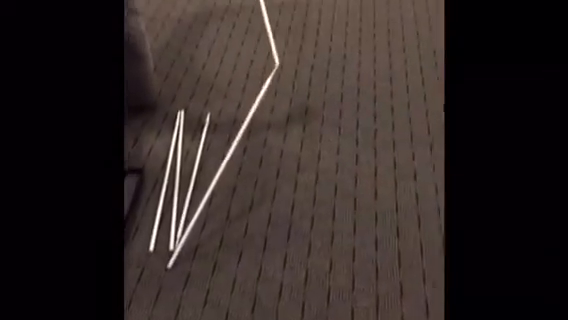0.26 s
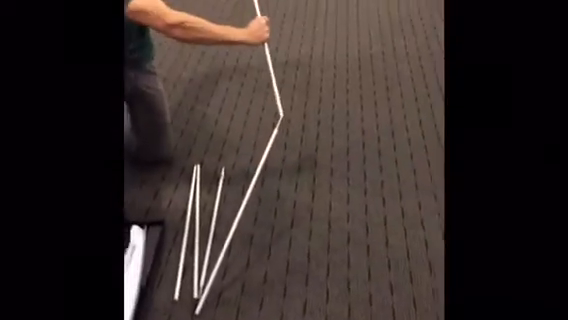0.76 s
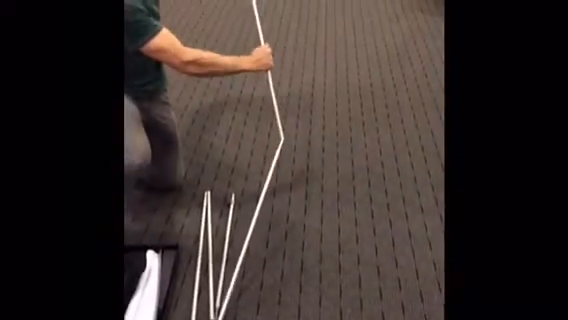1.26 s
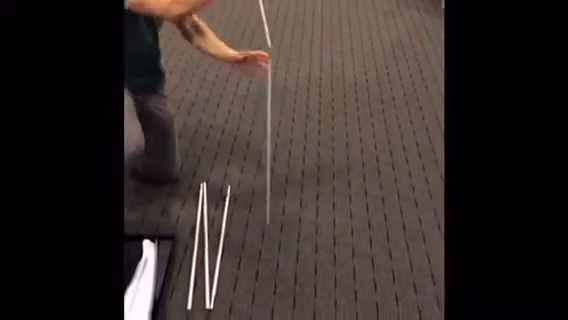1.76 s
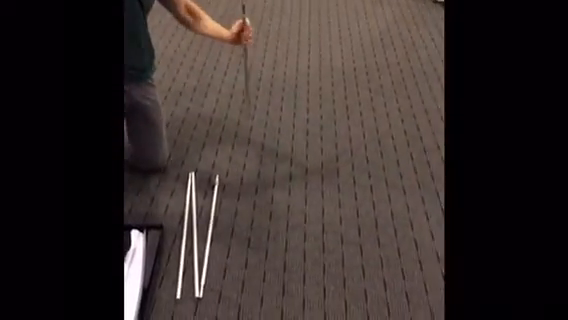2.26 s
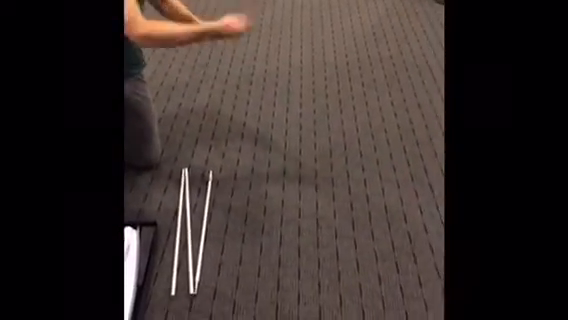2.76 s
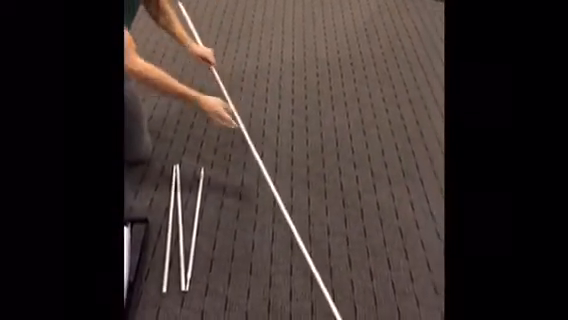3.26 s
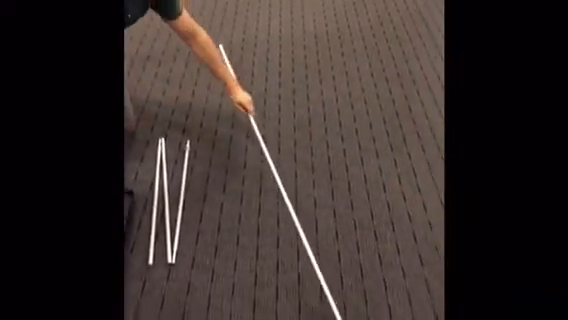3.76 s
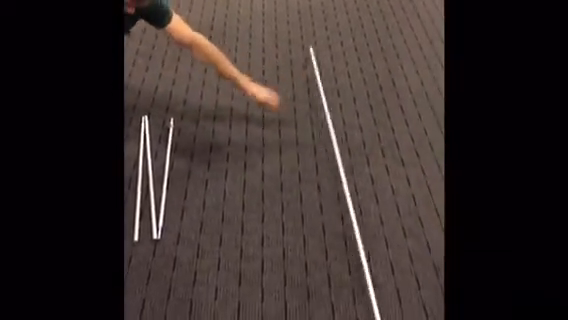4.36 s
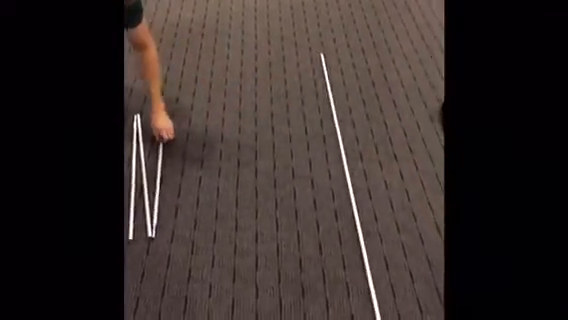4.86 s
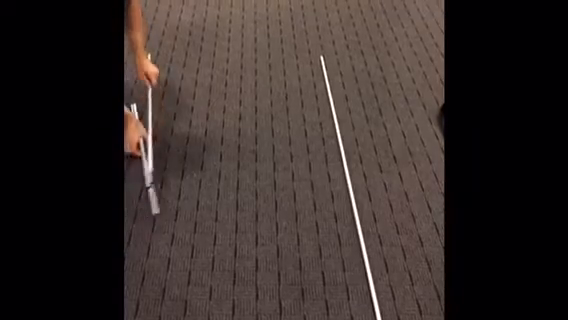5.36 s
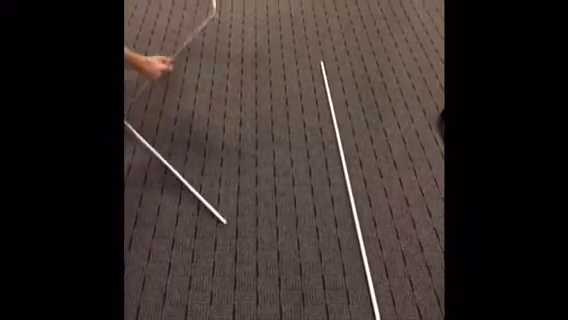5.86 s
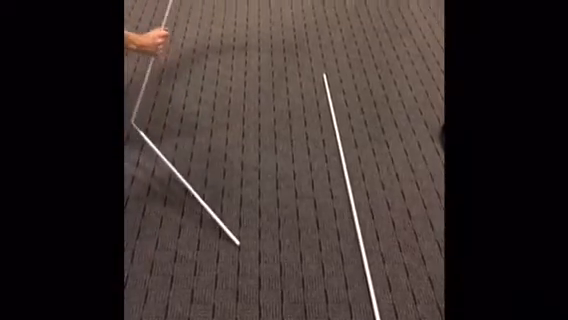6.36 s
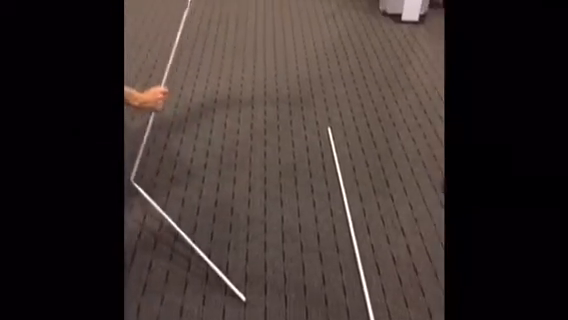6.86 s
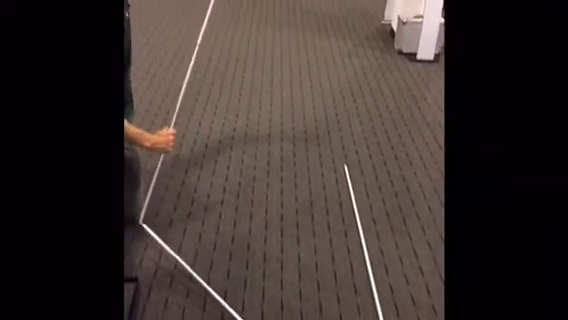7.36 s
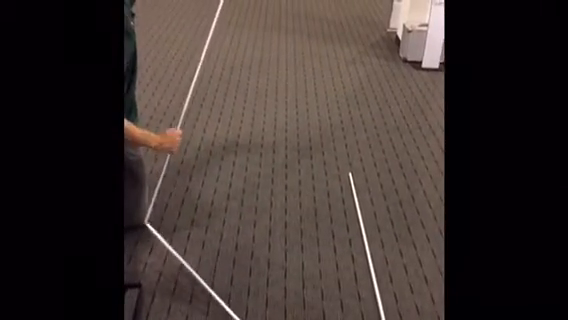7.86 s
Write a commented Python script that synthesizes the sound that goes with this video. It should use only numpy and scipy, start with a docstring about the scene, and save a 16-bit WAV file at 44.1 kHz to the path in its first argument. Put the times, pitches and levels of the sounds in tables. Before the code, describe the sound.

Close, single-channel sound of tent-like poles being assembled indoors, with slight room reverberation. Dry sharp clicks come in irregular groups, with barely audible ticking and skin sliding between them. A finished pole falls on carpet, clattering in a tight burst. After a quiet spell, another joint shoots home with a clear metallic ring. Low airflow and fan hum never stop.

```python
"""A carpeted, ventilated room: shock-corded tent poles are unfolded, their metal ferrules ticking into the sockets.
Each contact is a chatter of filtered noise impacts; each tube is a sum of decaying bending modes.
One finished pole is let go, thuds and rattles on the floor; a joint of the next one shoots home and rings.
Hands slide along the tubes as shaped noise; coloured noise and wavering tones form the ventilation throughout."""
import sys
import numpy as np
from scipy import signal
from scipy.fft import rfft, irfft, next_fast_len
from scipy.io import wavfile
from scipy.ndimage import uniform_filter1d, minimum_filter1d

SR = 44100
rng = np.random.default_rng(int(sys.argv[2]) if len(sys.argv) > 2 else 0)


def output_pcm(signal):
    """Save a mono or channel-first signal as 16-bit PCM at the path in sys.argv[1].

    Samples are clipped to [-1, 1] before scaling.
    """
    pcm = np.clip(np.atleast_2d(signal).T, -1, 1) * 32767
    wavfile.write(sys.argv[1], SR, np.round(pcm).astype(np.int16))


N = 358533

# ventilation spectrum: (frequency [Hz], relative density [dB per Hz])
AIR_SPECTRUM = [(20, -23.5), (31, -14.5), (62, 0), (130, -1), (210, -6.5), (300, -10.5), (450, -19.5),
                (790, -25.5), (1300, -27.5), (2000, -32.5), (3200, -41.5), (6000, -48.5), (10000, -55),
                (15500, -59.5)]
# fan and duct tones: (frequency [Hz], rms level [dB], phase drift that broadens the line [Hz])
FAN_TONES = [(119, -41.5, 4), (177.7, -43, 3), (240, -47, 4), (349, -53, 5), (359, -53, 4), (580, -66, 5),
             (7120, -79, 80), (7900, -81, 150)]
# ferrules meeting their sockets:
# (time [s], relative level [dB], edge [dB], favoured tube pitch [Hz], chatter [s])
CLICKS = [(0.146, -20.5, -14, 4950, 0.0045), (1.114, -25, -6, 3070, .006), (1.122, -30, -16.5, 3240, .003),
          (1.151, -33, -4, 2960, 0.0035), (1.178, -22, -11, 2350, 0.0028),
          (1.201, -6.5, -6.5, 2460, 0.0096), (1.28, -15.5, -15, 3320, 0.0094),
          (1.819, -33.5, -16, 3050, 0.0045), (2.419, -35, -17.5, 3010, 0.0054),
          (2.478, -39, -5, 2740, 0.0061), (2.604, -2.5, -5, 5300, .007), (2.659, -13.5, 3, 2400, 0.002),
          (2.733, -15.5, -3, 2470, 0.0076), (3.174, -34.5, -25, 3210, .004), (3.541, -30, -6, 2950, .005),
          (5.408, -31.5, -23, 3500, 0.0087), (5.421, -29.5, -16, 3260, 0.0045),
          (5.437, -28, -18, 3140, 0.0046), (5.584, -23.5, -28, 3400, 0.0013),
          (6.8, -39.5, -22, 3230, 0.0042), (7.217, -13.5, -13, 2450, 0.0021)]
# spells of faint ticking while a section shifts in its joint:
# (start [s], end [s], mean relative level [dB], edge [dB])
TICKING = [(1.436, 1.654, -43, 4), (1.716, 1.774, -50, 8), (3.724, 3.967, -43, -14),
           (4.931, 5.142, -43.5, -20)]
# spectrum of a ferrule tick: (frequency [Hz], relative density [dB per Hz])
TICK_SPECTRUM = [(100, -43), (600, -19), (1200, -4.5), (1900, -3), (2500, -2), (3600, -4.5), (5400, -5.5),
                 (7500, -6.5), (10000, -4.5), (15000, -14)]
# modes of tube sections with play in their joints: (frequency [Hz], relative level [dB], t60 [s])
LOOSE_MODES = [(1130, -12, .05), (1760, -16, .1), (2400, -5, .12), (2490, -5, .09), (3000, -4, .1),
               (3190, -1, .11), (3290, -4, .09), (3450, -6, .07), (4010, -4, .08), (4215, -2, .1),
               (4680, -3, .08), (4950, -2, .08), (5280, 0, .08), (5600, -2, .07), (6030, -2, .09),
               (6400, -4, .07), (7400, -4, .07), (8400, -7, .06), (9450, -9, .05)]
# strokes of skin along the tube: (start [s], end [s], nominal level [dB])
STROKES = [(3.065, 3.347, -75), (3.72, 3.77, -63), (5.138, 5.509, -68), (5.8, 6.199, -68),
           (8.092, 8.13, -61.5)]
# spectrum of sliding skin: (frequency [Hz], relative density [dB per Hz])
SKIN_SPECTRUM = [(1500, -22), (4000, 5), (9000, 3), (15000, 2)]
# the dropped pole hitting the floor:
# (time [s], relative level [dB], chatter [s], t60 of the rattle that follows [s])
BOUNCES = [(4.409, 7.5, 0.0071, 0.15), (4.43, -1, 0.012, 0.5), (4.509, -10, .004, 0.6),
           (4.547, -9.5, 0.0034, 0.21), (4.575, -16, 0.0061, 0.11), (4.621, 4.5, 0.0042, 0.76),
           (4.647, -1, 0.0056, 0.18), (4.732, 0.5, 0.003, 0.16), (4.779, -9, 0.0027, 0.068)]
# spectrum of the pole landing on carpet: (frequency [Hz], relative density [dB per Hz])
THUD_SPECTRUM = [(40, -21.5), (190, 11.5), (320, -5), (520, -14.5), (900, -27), (3000, -62.5)]
# spectrum of a loose joint knocking: (frequency [Hz], relative density [dB per Hz])
RATTLE_SPECTRUM = [(100, -31.5), (450, -7), (850, -57.5), (1400, -11.5), (2200, -5.5), (3200, 0),
                   (4400, -0.5), (7000, -4), (10000, -6.5), (15000, -17.5)]
# the cord pulls a joint fully home: (time [s], relative level [dB])
SNAPS = [(7.764, -5)]
# spectrum of the joint slamming home: (frequency [Hz], relative density [dB per Hz])
SLAM_SPECTRUM = [(100, -48), (550, -25), (800, -8.5), (1200, -14), (1800, -3), (3200, 6.5), (5500, 6),
                 (8000, 0), (11500, -5.5), (15000, -8)]
# modes of the tightly seated pole: (frequency [Hz], relative level [dB], t60 [s])
SEATED_MODES = [(1170, -11, .12), (1745, -11, .7), (1770, 7, .08), (1820, -1, .1), (2385, -3, .38),
                (2411, -3, .36), (3005, -6, .2), (3190, 0, .3), (3340, -6, .18), (4066, 5, .26),
                (4088, -1, .36), (5110, -7, .38), (5250, -5, .2), (6025, -9, .3), (7161, 0, .31),
                (8257, -6, .24), (9330, -6, .23), (10570, -10, .2)]
# reverberation of the room: (frequency [Hz], t60 [s])
ROOM_DECAY = [(200, 0.4), (1000, 0.83), (3000, 0.52), (6000, 0.37), (10000, 0.35), (15000, 0.26)]

AIR_DB = -36.5  # rms level of the rush
SOFT_DB, THINNING = -31.5, 0.5  # a click harder than this loses body, in dB per dB
FERRULE_HZ = 5370
RING_DB, RING_LOSS = 2.5, 0.2  # ring against a soft tick [dB], and its loss per dB of force
GRIP_T60_S = 0.31  # the hand around the tube shortens its ring
FAINT_TUBE_HZ, FAINT_CHATTER_S = 3170, 0.005
STROKE_RISE_S, STROKE_T60_S = 0.04, 0.45  # time constant of the swell; release
RATTLE_GAPS_S = (0.00315, 0.0147)  # shortest and longest gap between knocks
RATTLE_DB, RATTLE_CHATTER_S = -5.5, 0.0048  # rattle against its bounce; chatter of each knock
# body of a 0 dB knock [dB], body lost per dB of force, edge [dB]
BOUNCE_BODY_DB, BOUNCE_THINNING, BOUNCE_EDGE_DB = 1, 0.69, -4.5
OVERLOAD = 1.4  # level at which the microphone saturates (full scale 1)
TOP_HZ = 15600  # upper band limit


def amp(db):
    """Level in dB expressed as an amplitude ratio."""
    return 10 ** (np.asarray(db) / 20)


def unit(x):
    """Normalization to an rms of 1."""
    return x / np.sqrt(np.mean(x ** 2) + 1e-20)


def along(points, hz):
    """Linear interpolation of (frequency [Hz], value) points on a log-frequency axis."""
    f, v = np.transpose(points)
    return np.interp(np.log(hz + 1), np.log(f + 1), v)


def fade(t, t60):
    """Exponential decay: 60 dB in t60 seconds."""
    return np.exp(-np.log(1000) * t / np.maximum(t60, 1e-4))


def noise(gain, size):
    """Spectral shaping: white noise filtered by a gain over frequency, at rms 1."""
    m = next_fast_len(size)
    spectrum = rfft(rng.standard_normal(m)) * gain(np.fft.rfftfreq(m, 1 / SR))
    return unit(irfft(spectrum, m)[:size])


def add(track, s, sound):
    """Superposition: a sound is summed into the track from time s."""
    part = track[round(s * SR):]
    part[:len(sound)] += sound[:len(part)]


def ventilation():
    """Broadband flow noise with fan tones whose lines are broadened by a random walk of phase."""
    rush = amp(AIR_DB) * noise(lambda hz: amp(along(AIR_SPECTRUM, hz)), N)
    t = np.arange(N) / SR
    for hz, db, width in FAN_TONES:
        drift = np.cumsum(rng.standard_normal(N)) * np.sqrt(np.pi * abs(width) / SR)
        phase = 2 * np.pi * hz * t + uniform_filter1d(drift, size=128)
        rush = rush + amp(db) * np.sqrt(2) * np.sin(phase)
    return rush


def tilt(hz, body_db, edge_db):
    """Contact stiffness as spectral balance: body below 1.9 kHz against edge above 11 kHz."""
    return along([(1900, body_db), (5200, 0), (7000, 0), (11000, edge_db)], hz)


def bump(hz, centre_hz, height_db):
    """A resonance in dB, at half its height about a semitone from the centre."""
    return height_db / (1 + (np.log(hz / centre_hz + 1e-9) / 0.057) ** 2)


def crack(colour, hold, t60, grain_db, first_db):
    """Impact excitation: a hard first contact, a few ms of tiny impacts, then a fast decay."""
    t = np.arange(SR // 2) / SR
    impacts = amp(grain_db * noise(lambda hz: 1 / (1 + (hz / 600) ** 4), len(t)))
    burst = unit(impacts * noise(lambda hz: amp(colour(hz)), len(t)))
    chatter = fade(np.maximum(t - hold, 0), t60)
    first_contact = amp(first_db) * fade(t, t60=0.0054)
    return burst * (chatter + first_contact)


def ring(modes, scatter_db, pitch_hz=1, focus_db=0):
    """Modal superposition: bending modes of the tube, weighted by the place of contact."""
    t = np.arange(SR // 2) / SR
    hz, db, t60 = np.transpose(modes)[:, :, None]
    scatter = scatter_db * rng.standard_normal(hz.shape)
    size = amp(db + bump(hz, pitch_hz, focus_db) + scatter)
    waves = np.sin(2 * np.pi * (hz * t + rng.random(hz.shape)))
    onset = 1 - fade(t, t60=0.003)
    return np.sum(size * waves * onset * fade(t, t60), axis=0) / np.linalg.norm(size)


def in_room(sound, wet_db, delay):
    """Reverberation: direct sound, then the diffuse answer of the distant walls, by convolution."""
    hz, t, z = signal.stft(rng.standard_normal(SR * 3 // 4), SR, nperseg=256)
    decay = fade(t, along(ROOM_DECAY, hz)[:, None])
    tail = signal.istft(z * decay, SR, nperseg=256)[1]
    tail *= 1 - np.exp(-(np.arange(len(tail)) / SR / delay) ** 2)  # gradual build-up
    response = amp(wet_db) * tail / np.linalg.norm(tail)
    response[0] += 1  # direct sound
    return signal.fftconvolve(sound, response)


def click(db, edge_db, tube_hz, chatter):
    """Force-dependent contact: the harder the ferrule strikes, the thinner it sounds."""
    excess_db = db - SOFT_DB

    def colour(hz):
        balance = tilt(hz, -THINNING * excess_db, edge_db)
        return along(TICK_SPECTRUM, hz) + balance + bump(hz, FERRULE_HZ, height_db=3)

    tick = crack(colour, hold=chatter, t60=0.03, grain_db=-0.5, first_db=1.5)
    grip = fade(np.arange(len(tick)) / SR, GRIP_T60_S)
    tube = ring(LOOSE_MODES, scatter_db=1.5, pitch_hz=tube_hz, focus_db=14.5)
    tone = amp(RING_DB - RING_LOSS * excess_db) * grip * tube
    tick_heard = in_room(tick, wet_db=-7.5, delay=0.015)
    tone_heard = in_room(tone, wet_db=-12.5, delay=0.015)
    return amp(db - 12.5) * (tick_heard + tone_heard)


def joints():
    """Impact of ferrules in sockets, as sharp clicks and faint uneven ticking; the grip adds damping."""
    track = np.zeros(N)
    for s, db, edge_db, tube_hz, chatter in CLICKS:
        add(track, s, click(db, edge_db, tube_hz, chatter))
    for start, end, db, edge_db in TICKING:
        slips = rng.random(size=3)
        for k, slip in enumerate(slips):
            s = start + (end - start) * (k + slip) / len(slips)
            tick_db = db + 2 * rng.standard_normal()
            add(track, s, click(tick_db, edge_db, FAINT_TUBE_HZ, FAINT_CHATTER_S))
    return track


def hands():
    """Sliding friction: a faint, uneven hiss of skin that swells, holds and dies away with each stroke."""
    t = np.arange(N) / SR
    strokes = np.zeros(N)
    for start, end, db in STROKES:
        swell = np.exp(np.minimum(t - start, 0) / STROKE_RISE_S)
        release = fade(np.maximum(t - end, 0), STROKE_T60_S)
        strokes += amp(db) * swell * release
    grip_db = 3 * noise(lambda hz: 1 / (1 + (hz / 40) ** 2), N)
    return strokes * amp(grip_db) * noise(lambda hz: amp(along(SKIN_SPECTRUM, hz)), N)


def knock(db, chatter):
    """Impact of a loose joint, each at another place on the tube; soft knocks have more body."""
    body_db = BOUNCE_BODY_DB - BOUNCE_THINNING * max(db, -20)

    def colour(hz):
        return along(RATTLE_SPECTRUM, hz) + tilt(hz, body_db, BOUNCE_EDGE_DB)

    contact = crack(colour, hold=chatter, t60=0.04, grain_db=2.5, first_db=0)
    tone = ring(LOOSE_MODES, scatter_db=4.5, pitch_hz=rng.uniform(2300, 3600), focus_db=3)
    return amp(db - 16.0) * (contact + amp(-1.5) * tone)


def dropped_pole():
    """Repeated impact: a dull thud on carpet, then loose joints knocking ever softer after each bounce."""
    track, t = np.zeros(N), np.arange(SR // 2) / SR
    thud = fade(t, t60=0.51) * noise(lambda hz: amp(along(THUD_SPECTRUM, hz)), len(t))
    add(track, BOUNCES[0][0], amp(-21) * thud)
    for s, db, chatter, rattle_t60 in BOUNCES:
        bounce = knock(db, chatter)
        for lag in np.cumsum(rng.uniform(*RATTLE_GAPS_S, size=7)):
            sunk_db = 20 * np.log10(fade(lag, rattle_t60))
            knock_db = db + RATTLE_DB + sunk_db + 1.4 * rng.standard_normal()
            add(bounce, lag, knock(knock_db, RATTLE_CHATTER_S))
        add(track, s, in_room(bounce, wet_db=-12.0, delay=0.0044))
    return track


def seating_joint():
    """Free vibration after impact: a joint shoots home and the whole free length of the pole rings."""
    track = np.zeros(N)
    for s, db in SNAPS:
        slam = crack(lambda hz: along(SLAM_SPECTRUM, hz), hold=0.016, t60=0.07, grain_db=1, first_db=-20)
        blow = in_room(amp(-9) * slam, wet_db=-7, delay=0.015)
        tone = in_room(ring(SEATED_MODES, scatter_db=0.5), wet_db=-14, delay=0.02)
        add(track, s, amp(db) * (tone + blow))
    return track


def scene():
    """Superposition of all sources in one channel."""
    return (ventilation() + joints() + hands() + dropped_pole() + seating_joint())[None]


def limiter(x, ceiling, hold):
    """Peak limiting: the gain drops at once on a high peak, stays down for a moment and glides back."""
    size = 2 * int(hold * SR / 2) + 1
    needed = ceiling / np.maximum(np.abs(x), ceiling)
    held = minimum_filter1d(needed, size, origin=size // 2, mode="nearest")
    glide = uniform_filter1d(held, size=2001, origin=1000, mode="nearest")
    return x * np.minimum(held, glide)


def record(dry):
    """Saturation, peak limiting and a steep low-pass at the recorder's band limit."""
    rounded = dry / (1 + (np.abs(dry) / OVERLOAD) ** 4) ** (1 / 4)
    limited = limiter(rounded, ceiling=0.78, hold=0.28)
    m = next_fast_len(N + SR // 2)
    low_pass = 1 / (1 + (np.fft.rfftfreq(m, 1 / SR) / TOP_HZ) ** 120)
    return irfft(rfft(limited, m) * low_pass, m)[..., :N]


dry = scene()
out = record(dry)
output_pcm(out)
```